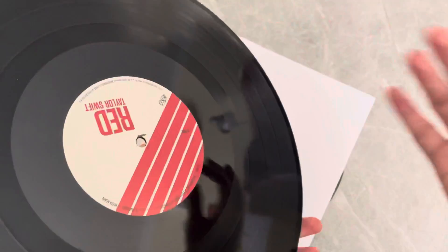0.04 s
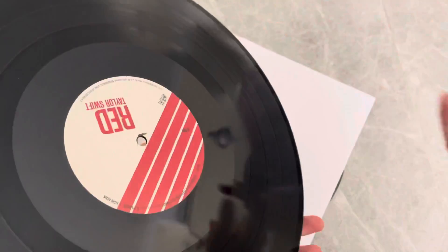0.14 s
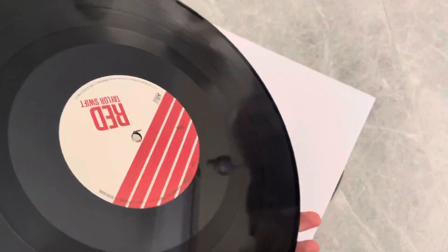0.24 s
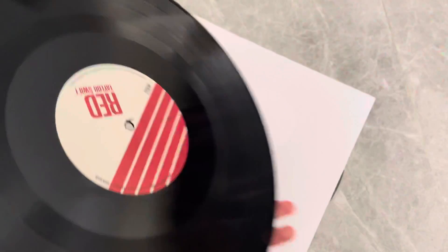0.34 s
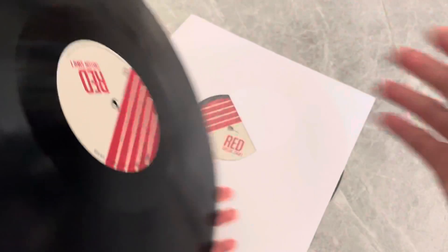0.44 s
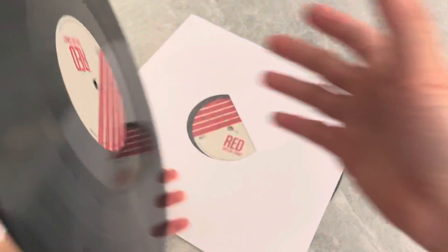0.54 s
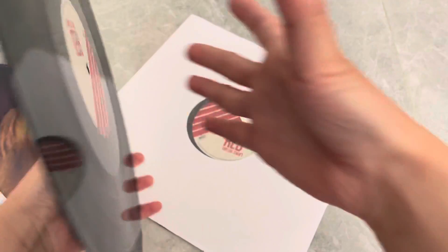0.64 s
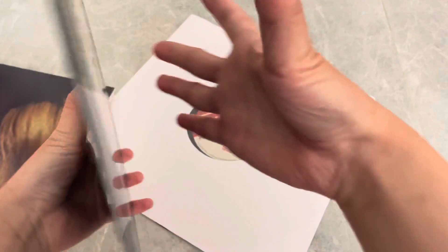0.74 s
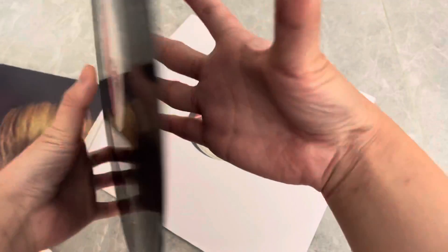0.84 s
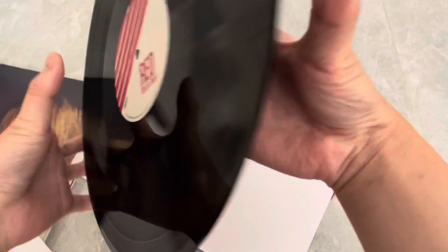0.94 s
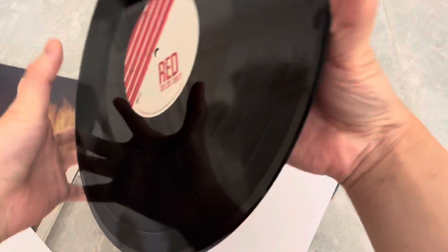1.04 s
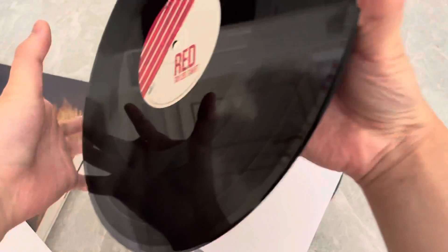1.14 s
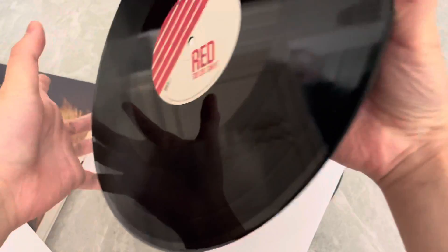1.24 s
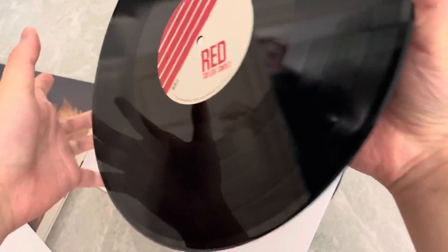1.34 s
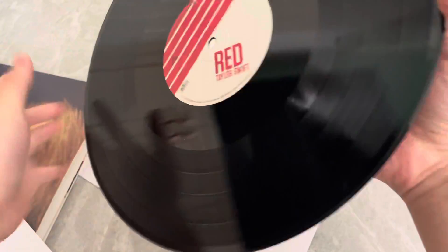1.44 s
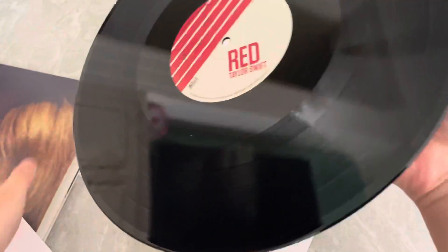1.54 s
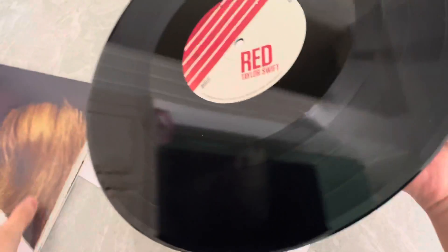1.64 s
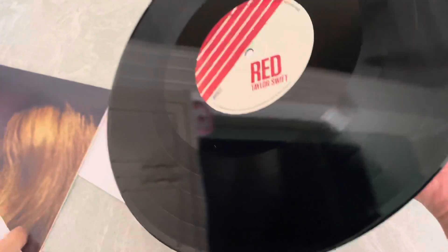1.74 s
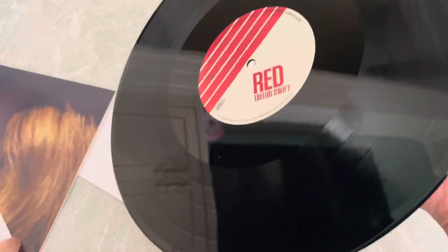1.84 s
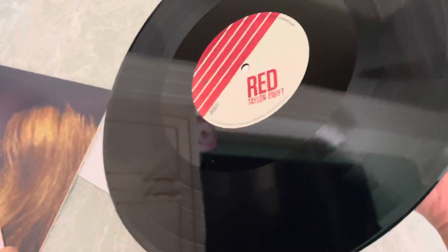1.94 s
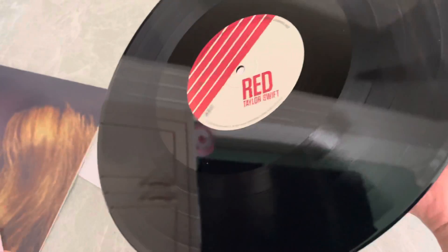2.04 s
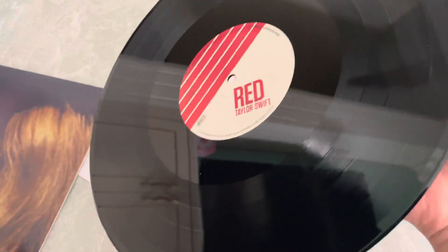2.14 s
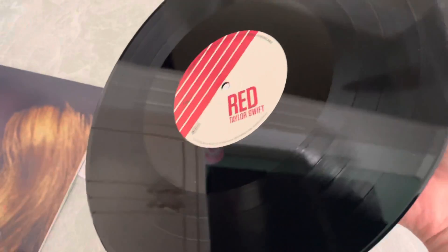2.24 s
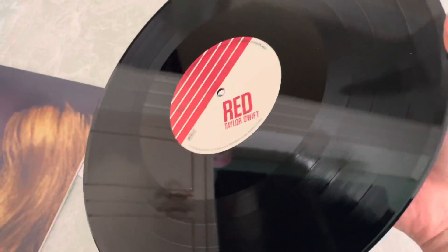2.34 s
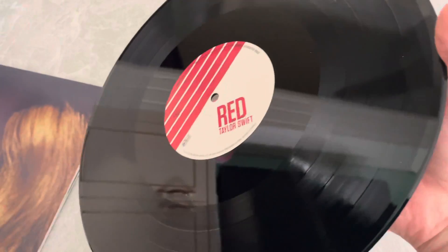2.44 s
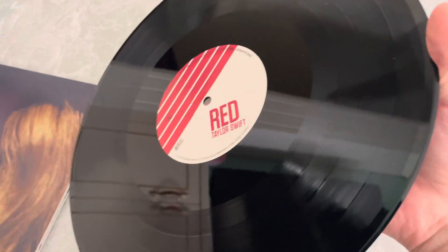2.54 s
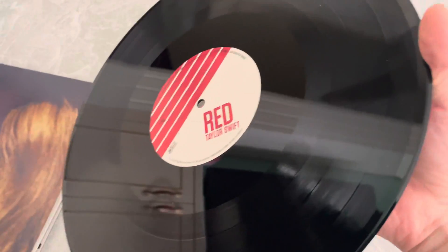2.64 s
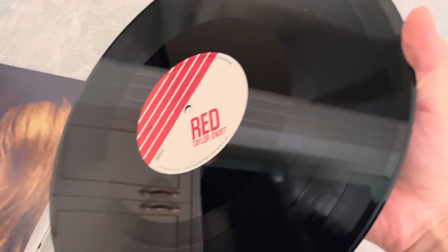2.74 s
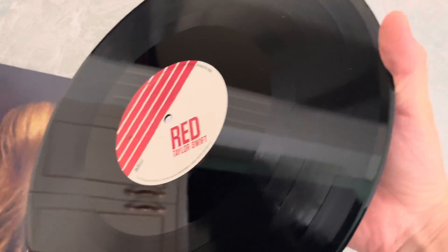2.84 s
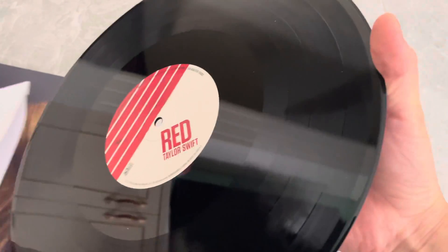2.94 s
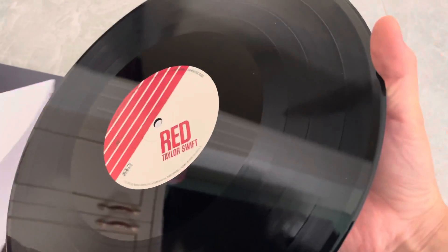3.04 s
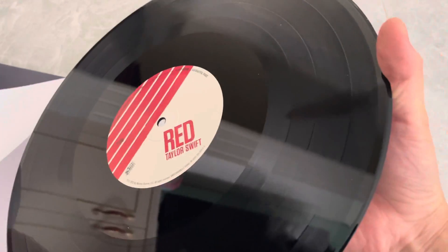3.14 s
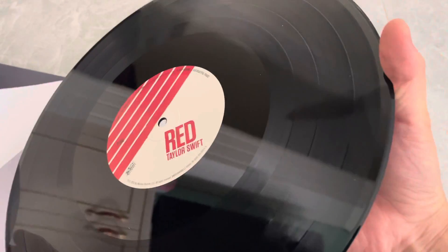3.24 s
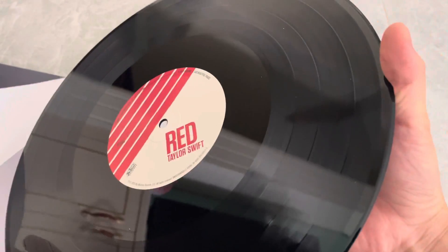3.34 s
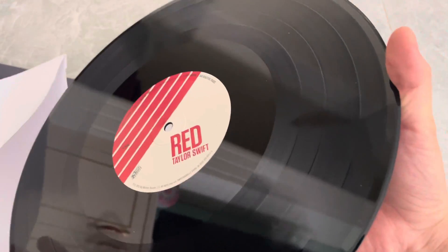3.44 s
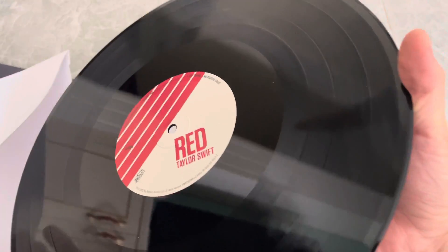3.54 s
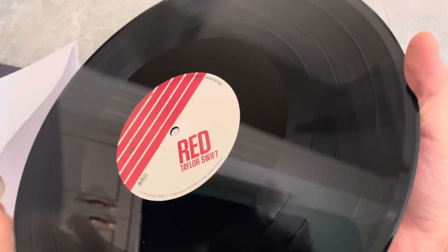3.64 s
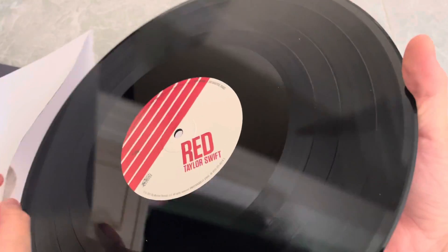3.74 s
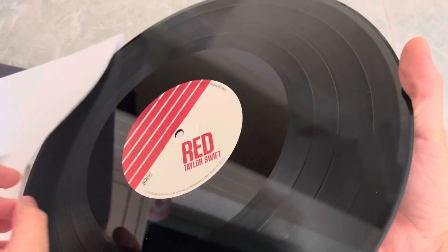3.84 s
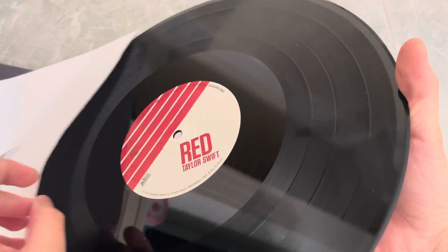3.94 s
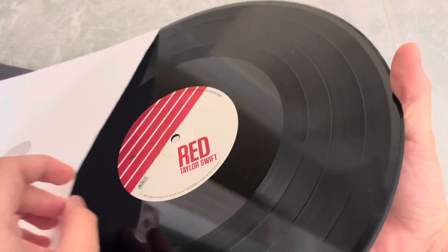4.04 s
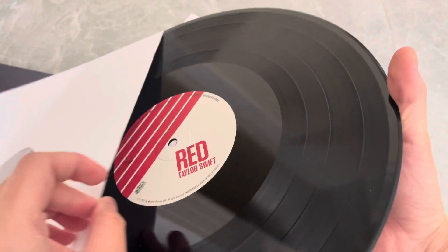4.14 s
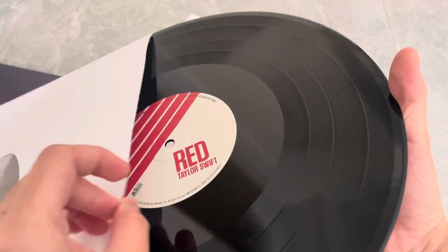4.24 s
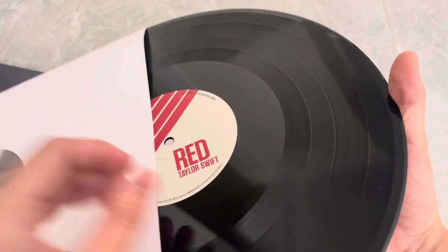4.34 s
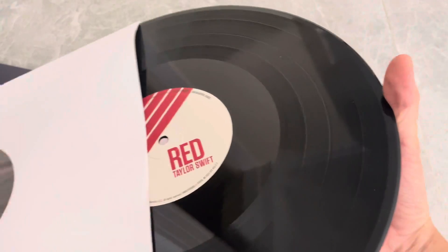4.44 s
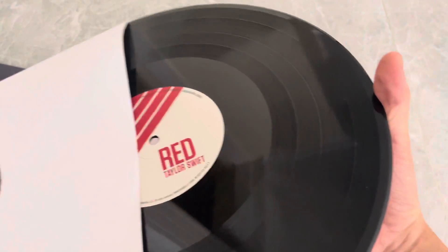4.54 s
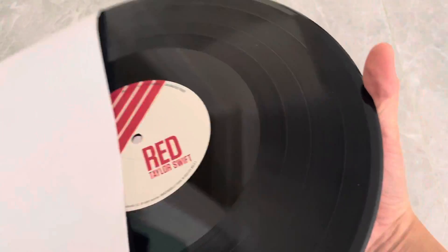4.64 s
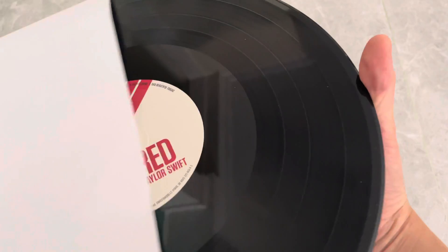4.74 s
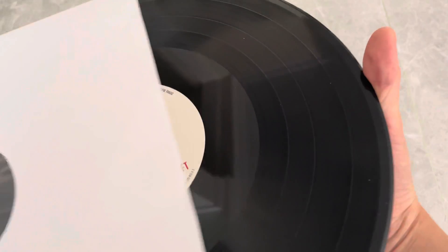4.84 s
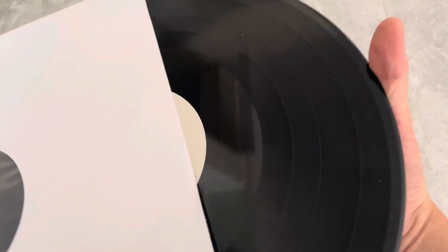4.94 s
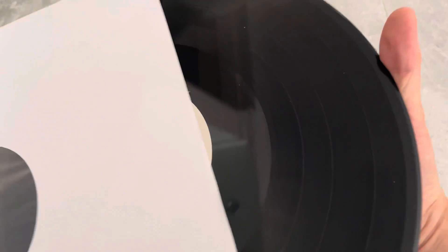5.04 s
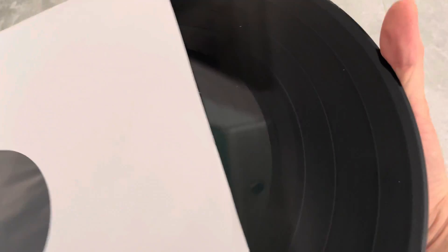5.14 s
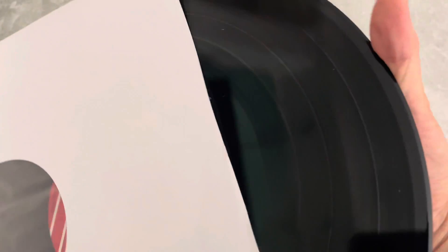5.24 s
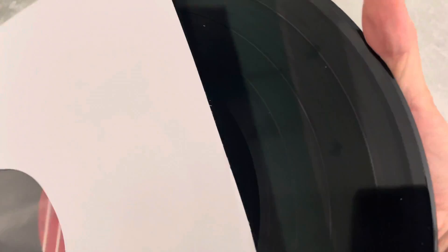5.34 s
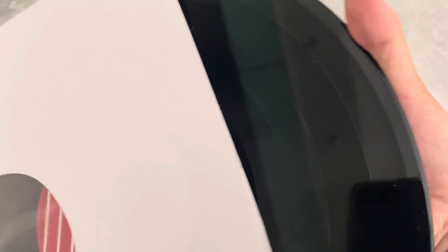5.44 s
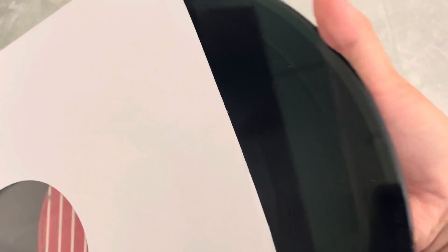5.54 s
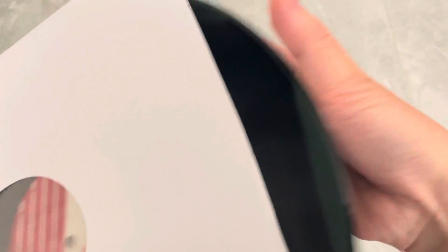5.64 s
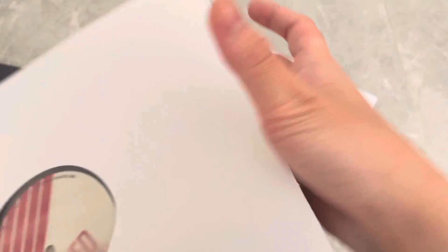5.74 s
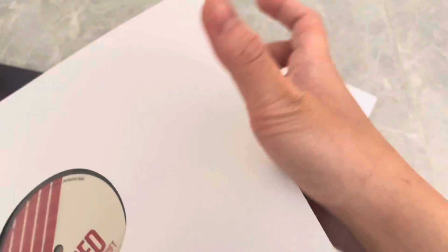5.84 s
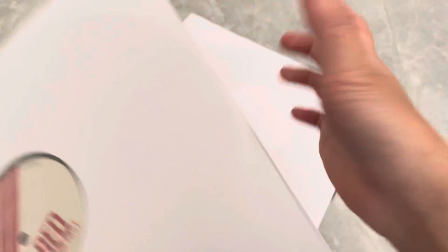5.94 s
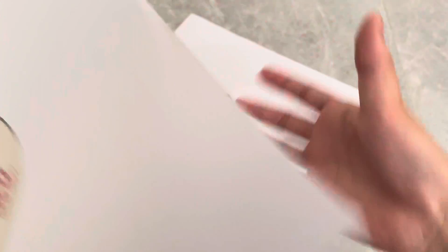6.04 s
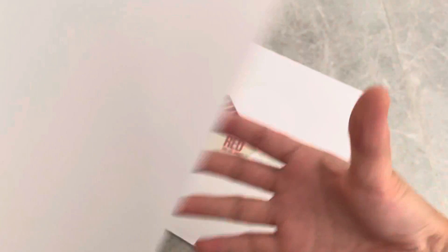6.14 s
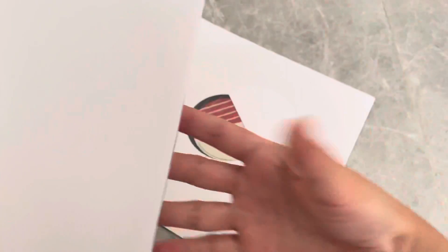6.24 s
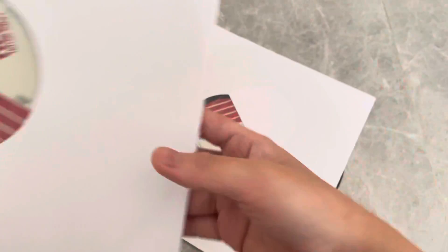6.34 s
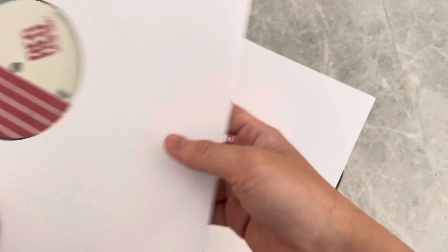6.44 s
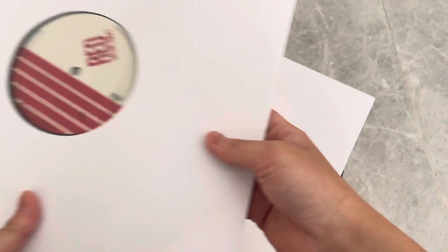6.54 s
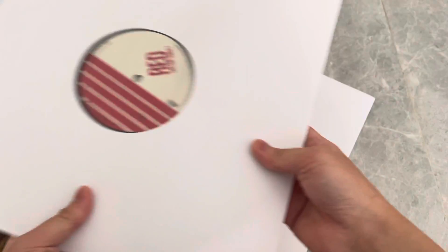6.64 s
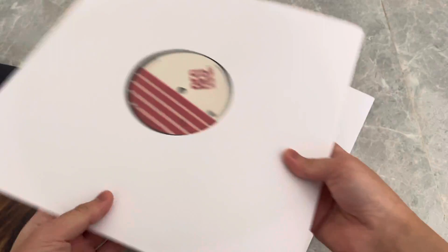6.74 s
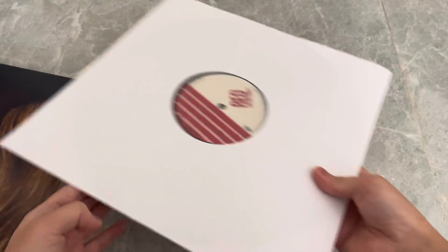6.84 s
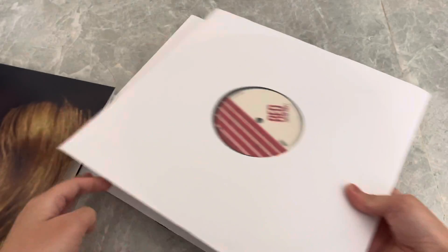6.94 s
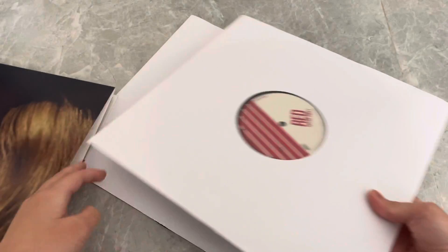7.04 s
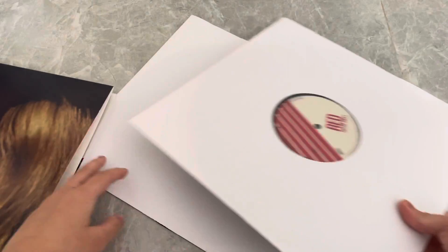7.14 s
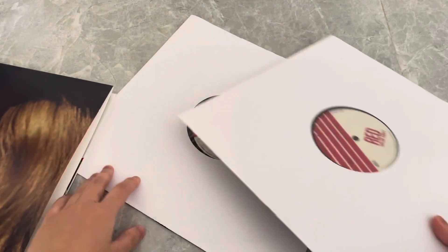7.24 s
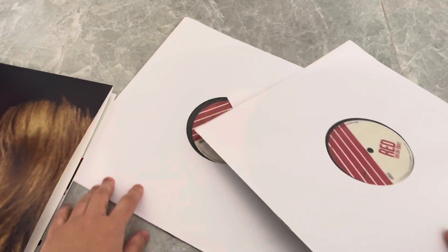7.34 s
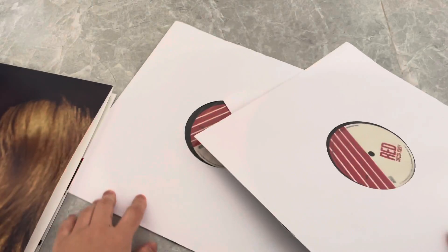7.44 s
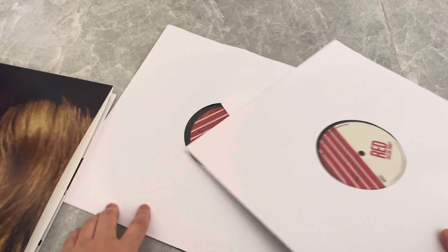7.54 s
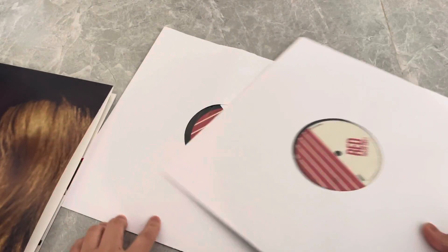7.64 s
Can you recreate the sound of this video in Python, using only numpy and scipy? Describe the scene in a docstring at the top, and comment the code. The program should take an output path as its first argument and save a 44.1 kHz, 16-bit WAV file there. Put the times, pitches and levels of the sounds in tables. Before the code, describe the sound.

A quiet room hums low throughout, and the handling is heard up close. From about 0.5 seconds come faint paper brushes and light taps as a vinyl record is turned, with a tiny thumb creak near 1.3 seconds. Around 2 seconds a paper sleeve slides with a thin hiss, joined by dry ticks and crinkles. From 3 seconds the paper rubs and buckles in uneven pushes, with soft low wobbles of the disc. The rustling grows after 4 seconds, and the sharpest snaps come at about 5 and 5.2 seconds. At 5.7 seconds the disc's edge slaps into the fold with a short scrape and a dull thump. Softer, airy paper brushing follows from 6 seconds. Light taps at about 7 and 7.3 seconds mark the sleeved record being laid down, ending with a brief slide.

```python
"""Vinyl disc into a paper sleeve.

A disc is turned in the hands, slid into its sleeve and laid on a stone floor; the quiet room hums.
Paper rubs on vinyl and skin: fibre clicks drive the sheet's modes, creases, rasp and hiss.
The sleeve buckles in snaps, ticks and pings. A thumb creaks on the rim; the disc wobbles and slaps
the fold. Two close microphone ports hear nearly the same sound, the treble turned in phase."""
import sys
import numpy as np
from scipy import signal
from scipy.fft import rfft, irfft, next_fast_len
from scipy.io import wavfile

SR = 44100
rng = np.random.default_rng(int(sys.argv[2]) if len(sys.argv) > 2 else 0)


def master_out(mix):
    """Clip the mix to full scale and print it as 16-bit PCM to the path in sys.argv[1]."""
    frames = np.transpose(np.atleast_2d(mix))
    ceiling = np.clip(frames, -1, 1)
    pcm = np.round(ceiling * 32767).astype(np.int16)
    wavfile.write(sys.argv[1], SR, pcm)


N = 339570

# room noise spectrum: freq_hz, gain_db
ROOM_SPECTRUM = [(15, -43.5), (25, -23), (53, -1), (86, -6.5), (118, -3), (149, -11), (203, -9.5),
                 (225, -13.5), (349, -22), (440, -19), (500, -22.5), (1170, -46), (12000, -56.5),
                 (15600, -89), (22000, -120)]
# wavering room tones: pitch_hz, width_hz, rms_db
HUM_TONES = [(119.9, 13, -70.5), (195.7, 3.2, -70.5), (442, 1.6, -77)]
# faint steady background noise: flex_db, crease_db, rasp_db, hiss_db
NOISE_FLOOR_DB = (-80, -91, -101, -103)
# left-right likeness: freq_hz, correlation
STEREO_LIKENESS = [(60, 0.94), (300, 0.86), (700, 0.41), (1500, 0.18), (3000, 0.36), (6000, 1), (12000, 1)]
# phase between ports: freq_hz, left_lead_rad
PORT_PHASE = [(0, 0), (690, .3), (1290, 0), (2840, .5), (4130, 0), (4910, .6), (6630, -.7), (7670, -3.0),
              (8870, -3.3), (9470, -4.1), (10400, -6.1), (12800, -6.5), (13900, -9.4), (16000, -9.4)]
# balance between ports: freq_hz, left_minus_right_db
PORT_BALANCE = [(60, 2.5), (110, 0), (200, 1.5), (380, 3.5), (700, 4.5), (1290, 2.5), (2380, 3.5),
                (4400, 4.5), (8120, 0), (15000, 0.5)]

# flexing modes of sleeve and disc: freq_hz, width_hz, gain_db
SHEET_MODES = [(75.5, 43, 4), (190, 155, 1.5), (325, 114, 4.5), (457.5, 73, 1.5), (544, 85, 0.5),
               (717, 360, -4), (908, 300, -25)]
# modes of the sleeve's fold: freq_hz, width_hz, gain_db
FOLD_MODES = [(315, 210, -2), (500, 280, -3), (1583, 320, -5.5), (2254, 150, -5), (2640, 390, -9),
              (3560, 340, -5), (4690, 1060, -17.5), (10700, 3300, -32.5)]
# rim modes under the thumb: freq_hz, width_hz, gain_db
RIM_MODES = [(610, 124, 47), (1990, 210, 37.5), (2930, 310, 26)]
# paper creasing: freq_hz, gain_db
CREASE_SPECTRUM = [(500, -26), (800, -9.5), (1050, -1), (1350, 3), (1600, 2), (1900, 3.5), (2400, 1),
                   (3200, -11.5), (5000, -59)]
# paper rasp: freq_hz, gain_db
RASP_SPECTRUM = [(1500, -45.5), (2300, -8), (2800, 2), (3600, 4), (4600, 1.5), (5500, -3.5), (7000, -12.5),
                 (9500, -18)]
# fine paper hiss: freq_hz, gain_db
HISS_SPECTRUM = [(3500, -36.5), (5500, -12), (7000, -3.5), (8200, -0.5), (10500, -7), (12500, -12),
                 (14000, -8.5), (15500, -25.5)]

# shoved disc swinging: start_s, level_db, pitch_hz, t60_s
WOBBLES = [(1.038, -48, 61, 0.17), (2.994, -42.5, 143, 0.1), (3.269, -52, 58.7, 0.16),
           (4.283, -35.5, 80.5, 0.25), (4.73, -65, 108, 0.25), (5.151, -32.5, 143, 0.048),
           (5.329, -38, 56.5, 0.19), (5.71, -30, 151, 0.12), (5.769, -35.5, 60.4, 0.23),
           (6.519, -44.5, 54, 0.2), (7.309, -53.5, 159, 0.19)]
# thumb slipping on the rim: time_s, slips_per_s, drive_db
THUMB_SLIPS = [(1.311, 160, -57), (1.334, 147, -57), (1.351, 200, -50), (1.369, 210, -50),
               (1.378, 140, -50)]
# steady slide of paper on vinyl and skin: time_s, rasp_db
SLIDE_LEVEL = [(1.57, -75), (1.63, -68), (1.86, -68), (2.1, -58), (2.215, -64), (2.29, -61.5), (2.355, -54),
               (2.45, -53), (2.56, -58), (2.6, -66.5), (2.685, -74.5), (2.74, -62), (3.05, -76.5),
               (3.15, -59.5), (3.24, -65.5), (3.65, -63), (3.8, -61), (3.87, -57.5), (4.24, -61),
               (4.42, -61), (4.535, -84), (4.64, -85), (4.86, -79), (5.02, -63), (5.35, -82), (5.47, -57.5),
               (5.56, -58), (5.64, -50.5), (5.69, -46.5), (5.76, -48), (5.81, -48), (5.88, -61),
               (6.046, -78), (6.28, -74.5), (6.39, -73), (6.51, -74.5), (6.56, -91.5), (6.88, -69),
               (6.92, -86), (6.99, -95), (7.24, -89), (7.49, -72), (7.578, -55.5), (7.7, -54)]
# slide colour, relative to rasp: time_s, flex_db, crease_db, hiss_db
SLIDE_COLOUR = [(1.6, -0.5, -1.5, 7), (2.1, -14.5, -10, -3.5), (2.5, -10.5, -6, 2.5),
                (2.65, -5.5, -3.5, -3), (3.1, -3.5, -8, -3.5), (3.898, -5.5, -3.5, 1),
                (4.4, 11.5, -1.5, -25), (4.9, -4, -7, 4), (5.3, 8, -9, -23), (5.56, -4.5, 1, -5),
                (5.8, 2.5, -1, -13), (6.2, 2, 6, -8), (6.34, -4.5, -25, -1.5), (6.75, -14, -23, 9),
                (6.9, -18, -11, 9), (6.97, 6, -4, 5), (7.1, 10.5, 3, 22), (7.4, -8, 9, 6.5),
                (7.6, -14, -11.5, 9)]
# shoves and brushes: peak_s, rise_s, fall_s, rasp_db; relative to rasp: flex_db, crease_db, hiss_db
STROKES = [(0.585, 0.03, 0.087, -79.5, -4, -30, 14.5), (0.65, 0.083, 0.034, -83, -11, -18, 14.5),
           (0.898, 0.034, 0.084, -86.5, 11, -7, 10), (1.02, 0.027, 0.12, -79.5, 18.5, 4, 2),
           (1.39, 0.14, 0.1, -74.5, 18, -1, -1), (2.785, 0.053, 0.24, -57, -1, 2.5, -7),
           (3.005, 0.032, 0.11, -60.5, 4.5, -2.5, 3), (3.261, 0.0067, 0.17, -58.5, 11.5, 5, -6),
           (3.395, 0.016, 0.18, -61.5, 1, 3.5, -4), (3.516, 0.031, 0.013, -47.5, -21, -12, -36),
           (3.69, 0.06, 0.082, -63.5, -2, 0, -7), (3.977, 0.024, 0.082, -48, 3, 5, -11),
           (4.124, 0.092, 0.12, -51.5, -2.5, 2.5, -13), (4.301, 0.06, 0.064, -50.5, 1.5, -4, -2.5),
           (4.605, 0.097, 0.059, -74.5, 8.5, 7, -38), (4.667, 0.02, 0.16, -44, 0, -9, -15),
           (4.758, 0.036, 0.2, -51.5, 3.5, 1.5, -4.5), (5.039, 0.021, 0.4, -53.5, 7.5, 3, -1.5),
           (5.164, 0.022, 0.12, -46, 2, 2.5, -4), (5.268, 0.088, 0.033, -51, -2.5, -1.5, -7),
           (5.437, 0.064, 0.45, -60, -4.5, -7, 2.5), (6.148, 0.077, 0.12, -67, 10.5, -3, 11.5),
           (6.435, 0.12, 0.097, -71, -19, -23, 5), (6.645, 0.059, 0.14, -68, -4, -28, 0),
           (6.83, 0.34, 0.12, -79.5, -28, -3, 13), (7.01, 0.0094, 0.26, -60.5, 2, 0, -11),
           (7.308, 0.043, 0.17, -60, 3, -10, 5.5)]
# narrow hiss in the slide: peak_s, rise_s, fall_s, level_db, pitch_hz, width_hz
SINGING_BANDS = [(0.6, 0.04, 0.12, -72, 4600, 1500), (2.08, 0.36, 0.2, -63.5, 4530, 690),
                 (2.36, 0.08, 0.2, -59, 4500, 600), (2.44, 0.2, 0.18, -53, 4500, 450),
                 (5.56, 0.1, 0.2, -57, 1510, 250), (5.66, 0.03, 0.03, -47, 1450, 200),
                 (5.81, 0.03, 0.03, -45, 1550, 250), (6.45, 0.05, 0.1, -66, 4900, 800),
                 (6.65, 0.08, 0.3, -64, 5250, 700), (6.82, 0.3, 0.2, -67.5, 4700, 607),
                 (7.01, 0.005, 0.1, -55.5, 950, 300), (7.14, 0.08, 0.04, -62, 1100, 250)]
# fibres or folds breaking: start_s, level_db
TICKS = [(2.2343, -32), (2.2385, -36), (2.2997, -28), (2.5092, -32), (2.9003, -44), (3.2924, -38),
         (3.3852, -38), (3.4047, -37), (3.4895, -36), (3.6775, -36), (4.4613, -41), (4.584, -42),
         (4.6084, -44), (4.994, -43), (5.3532, -42), (5.3654, -43), (5.4495, -24), (5.9858, -46),
         (7.1876, -45)]
# creases letting go: start_s, level_db, pitch_hz
PINGS = [(2.236, -39.5, 3250), (2.3, -43, 3500), (2.7599, -28, 3370), (2.7668, -36, 3230),
         (3.488, -36, 4870), (3.9825, -27, 3630), (4.2933, -19.5, 4550), (4.2935, -29, 6830),
         (4.7641, -46, 2210), (5.0365, -22, 2930), (5.157, -17.5, 2000), (5.4277, -31, 3000),
         (5.4505, -29, 3020)]
# disc edge hitting the fold: start_s, length_s, level_db
FOLD_SLAP = (5.7038, 0.0125, -18.5)
# sheet buckling or tapped, levels before trims: start_s, crack_db, thud_db, tick_db, patch_hz
SNAPS = [(1.0214, -50, -55.5, -67, 247), (1.261, -55, -53, -63, 250), (1.404, -52, -65, -59, 415),
         (1.4904, -46, -54, -59.5, 420), (1.497, -69, -44.5, -64, 333), (1.5732, -56, -45.5, -67, 378),
         (2.2352, -35, -93, -61, 452), (2.2984, -29, -100, -55, 436), (2.509, -57, -71, -39.5, 452),
         (2.53, -39, -53, -46, 590), (2.554, -32, -70, -44, 670), (2.758, -33, -47, -82, 474),
         (2.7644, -31, -49, -81, 765), (2.8579, -42, -45, -59, 253), (2.899, -29.5, -80, -51, 326),
         (2.992, -35.5, -69, -57, 352), (3.2589, -27.5, -26, -47, 287), (3.2934, -34, -48, -49.5, 440),
         (3.3218, -42.5, -61, -48.5, 659), (3.3862, -30, -40, -53, 395), (3.405, -36, -43, -44, 312),
         (3.4882, -47, -45, -68.5, 480), (3.6771, -35, -45.5, -44.5, 396), (3.967, -51, -50, -62, 297),
         (4.1193, -32, -42, -65, 334), (4.2938, -21, -47, -39.5, 303), (4.302, -31, -33.5, -63, 346),
         (4.317, -41, -41, -65, 248), (4.3707, -46, -42, -73, 625), (4.4598, -40, -79, -68, 432),
         (4.584, -47, -69, -64, 756), (4.6082, -40, -80, -55, 301), (4.661, -47, -37.5, -46, 420),
         (4.729, -37, -31.5, -72, 345), (4.737, -50, -38, -72, 350), (4.7642, -19, -30, -80, 350),
         (4.996, -41, -70, -75, 400), (5.0356, -7.5, -34.5, -24, 530), (5.043, -27, -29.5, -49.5, 330),
         (5.075, -27, -38.5, -54, 350), (5.135, -47.5, -43, -60.5, 460), (5.1547, -9.5, -32, -34, 430),
         (5.289, -45, -70, -43, 400), (5.354, -37, -64, -69, 400), (5.3657, -54, -51, -58, 227),
         (5.4275, -16, -41, -39.5, 1176), (5.449, -22, -86, -41, 436), (5.5074, -28, -49, -58, 440),
         (5.618, -47.5, -37.5, -62.5, 500), (5.635, -48, -39.5, -62, 510), (5.727, -14, -37, -34, 555),
         (5.7382, -17.5, -29.5, -39, 383), (5.7993, -37.5, -44, -46, 382), (5.985, -62, -73, -57, 436),
         (6.0353, -58.5, -46, -72.5, 287), (6.055, -72, -50, -78, 275), (6.282, -52, -63, -70, 400),
         (6.309, -63, -49.5, -78, 293), (6.3297, -42, -49.5, -81, 540), (6.428, -78, -52, -67, 254),
         (6.635, -57, -53.5, -77, 296), (7.0058, -41, -44.5, -76, 776), (7.026, -60, -68, -74, 900),
         (7.068, -43, -54.5, -70, 950), (7.1875, -64, -78, -56, 307), (7.261, -67, -51, -70, 680),
         (7.297, -57, -53, -65, 806), (7.3073, -48, -43, -63, 278)]

SNAP_T60_S = (0.073, 0.03, 0.017, 0.022)   # thud, knock, crack, tick
SNAP_RISE_S = (0.00019, 0.0013, 0.0017, 0.00024)
HIT_UNSHARED = 0.3   # hits come from one spot: share of left-right unlikeness kept


def from_db(db):
    """Decibels to gain."""
    return 10 ** (np.asarray(db) / 20)


def rms_one(x):
    """Scale to rms 1."""
    return x / np.sqrt(np.mean(x ** 2) + 1e-20)


def at_hz(points, hz):
    """Table lookup on a log-frequency axis."""
    table = np.array(points, float)
    return np.interp(np.log(hz + 1), np.log(table[:, 0] + 1), table[:, 1])


def shaped(x, response):
    """Filter by a response given as a function of Hz."""
    size = next_fast_len(N + 4096)
    hz = np.arange(size // 2 + 1) * SR / size
    return irfft(rfft(x, size) * response(hz), size)[..., :N]


def coloured(x, spectrum):
    """Filter by a spectrum table."""
    return shaped(x, lambda hz: from_db(at_hz(spectrum, hz)))


def butter(x, order, cutoff_hz, kind="low"):
    """Butterworth filter."""
    return signal.sosfilt(signal.butter(order, cutoff_hz, kind, fs=SR, output="sos"), x)


def drift(rate_hz):
    """Smooth random wander, rms 1."""
    pole = np.exp(-2 * np.pi * rate_hz / SR)
    return rms_one(signal.lfilter([1], [1, -2 * pole, pole * pole], rng.standard_normal(N + SR))[SR:])


def resonance(x, hz, width_hz):
    """Two-pole band-pass, peak gain 1."""
    r = np.exp(-np.pi * width_hz / SR)
    gain = (1 - r * r) / 2
    trickle = 1e-15 * (np.arange(x.shape[-1]) % 7)   # avoids denormals
    return signal.lfilter([gain, 0, -gain], [1, -2 * r * np.cos(2 * np.pi * hz / SR), r * r], x + trickle)


def ring(x, modes):
    """Parallel modes of alternating sign."""
    return sum((-1) ** k * from_db(db) * resonance(x, hz, width_hz)
               for k, (hz, width_hz, db) in enumerate(modes))


def spread(pair, unshared=1):
    """Two independent signals to stereo with frequency-dependent likeness."""
    def alike(hz):
        return 1 - unshared * (1 - at_hz(STEREO_LIKENESS, hz))
    mid = shaped(pair[0], lambda hz: np.sqrt((1 + alike(hz)) / 2))
    side = shaped(pair[1], lambda hz: np.sqrt((1 - alike(hz)) / 2))
    return np.array([mid + side, mid - side])


def add_at(track, start_s, event):
    """Mix an event into a mono track."""
    i = round(start_s * SR)
    track[i:i + len(event)] += event[:N - i]


def burst(t, level_db, t60_s, rise_s):
    """Envelope: quick rise, exponential decay."""
    return from_db(level_db - 60 * t / t60_s) * (1 - np.exp(-t / rise_s))


def stroke(peak_s, rise_s, fall_s):
    """Span and envelope of one movement: up 20 dB per rise_s, down 20 dB per fall_s."""
    span = slice(max(round((peak_s - 3 * rise_s) * SR), 0), min(round((peak_s + 3 * fall_s) * SR), N))
    t = np.arange(span.start, span.stop) / SR - peak_s
    return span, from_db(20 * np.minimum(t / rise_s, -t / fall_s))


def room_tone(noise_db=-62.5):
    """Dull steady noise and wavering tones."""
    noise = coloured(rng.standard_normal((2, N)), ROOM_SPECTRUM)
    hum = sum(from_db(db) * rms_one(resonance(rng.standard_normal(N), hz, width_hz))
              for hz, width_hz, db in HUM_TONES)
    return spread(from_db(noise_db + drift(2.3)) * rms_one(noise)) + hum


def room_reverb(x, t60_s=0.08, gain_db=-15, wall_cutoff_hz=4500):
    """Diffuse tail: decaying noise, independent per channel."""
    t = np.arange(int(.6 * SR)) / SR
    tail = rng.standard_normal((2, len(t))) * from_db(-60 * t / t60_s) * (t > .006)
    tail = butter(tail, 1, wall_cutoff_hz)
    tail /= np.sqrt(np.sum(tail ** 2, axis=1, keepdims=True))
    return from_db(gain_db) * signal.fftconvolve(x.mean(0)[None], tail, axes=1)[:, :N]


def disc_wobbles():
    """Low damped swings of the whole disc."""
    out, t = np.zeros(N), np.arange(SR // 2) / SR
    for start_s, db, hz, t60_s in WOBBLES:
        add_at(out, start_s, burst(t, db, t60_s, rise_s=0.00065) * np.sin(2 * np.pi * hz * t))
    return out


def sheet_flex(x, top_hz=1130):
    """Low modes of sleeve and disc."""
    return butter(ring(x, SHEET_MODES), 4, top_hz)


def thumb_creak():
    """Skin sticks and slips on vinyl: uneven clicks into the disc, each trailing a dull scrape."""
    time_s, slips_per_s, drive_db = np.transpose(THUMB_SLIPS)
    t = np.arange(N) / SR
    rate_hz = np.interp(t, time_s, slips_per_s) * (1 + 0.03 * drift(67)) * (t > time_s[0])
    cycles = np.cumsum(rate_hz) / SR + .8   # early first slip
    drive = from_db(np.interp(t, time_s, drive_db)) * (t < time_s[-1])
    slips = np.diff(np.floor(cycles), prepend=0) * drive
    scrape = signal.lfilter([1], [1, -.988], slips) * rng.standard_normal(N)
    dull_scrape = signal.lfilter([.45], [1, -.55], scrape)
    soft_slips = signal.lfilter([.12], [1, -.88], slips)   # skin is a soft contact
    rim = sum(from_db(db) * resonance(soft_slips, hz, width_hz) for hz, width_hz, db in RIM_MODES)
    return from_db(39) * sheet_flex(soft_slips) + rim + from_db(6.5) * dull_scrape


def fibre_clicks(per_s, uneven_db):
    """Fibres catch and let go: two random click trains, rms 1."""
    sizes = from_db(uneven_db * np.minimum(rng.exponential(1, (2, N)), 4))
    signs = rng.choice([-1, 1], (2, N))
    return rms_one(sizes * signs * (rng.random((2, N)) < per_s / SR))


def paper(envelopes, per_s, uneven_db):
    """Fibre clicks excite flex, crease, rasp and hiss, one envelope each."""
    clicks = fibre_clicks(per_s, uneven_db)
    out = sheet_flex(clicks * envelopes[0]) / np.std(sheet_flex(clicks[0]))
    for spectrum, envelope in zip([CREASE_SPECTRUM, RASP_SPECTRUM, HISS_SPECTRUM], envelopes[1:]):
        out += coloured(clicks * envelope, spectrum) / np.std(coloured(clicks[0], spectrum))
    return out


def contact_envelopes():
    """Flex, crease, rasp and hiss envelopes: slide and strokes over faint steady background noise."""
    t = np.arange(N) / SR
    time_s, flex_db, crease_db, hiss_db = np.transpose(SLIDE_COLOUR)
    colours_db = [flex_db, crease_db, np.zeros_like(time_s), hiss_db]
    slide_db = np.interp(t, *np.transpose(SLIDE_LEVEL), left=-120)
    envelopes = np.array([from_db(slide_db + np.interp(t, time_s, colour_db)) + from_db(floor_db)
                          for colour_db, floor_db in zip(colours_db, NOISE_FLOOR_DB)])
    for peak_s, rise_s, fall_s, rasp_db, flex_db, crease_db, hiss_db in STROKES:
        span, shape = stroke(peak_s, rise_s, fall_s)
        envelopes[:, span] += shape * from_db(rasp_db + np.array([[flex_db], [crease_db], [0], [hiss_db]]))
    return envelopes


def wandering_contact(x, depth_db=1.8, rate_hz=6):
    """Contact wanders over the sheet: half-octave bands swell and sink independently."""
    def band(centre_hz):
        return shaped(x, lambda hz: np.cos(np.pi * np.clip(np.log2((hz + 1) / centre_hz), -.5, .5)) ** 2)
    return sum(band(hz) * from_db(depth_db * drift(rate_hz)) for hz in 125 * 2 ** np.arange(0, 7.6, .5))


def paper_rubbing():
    """Dense fibre clicks under wavering pressure, plus sparse crackle of the bending sheet."""
    pressure_db = drift(13)
    envelopes = [envelope * from_db(pressure_db + drift(23)) for envelope in contact_envelopes()]
    crackle = from_db(-14) * paper(envelopes, per_s=300, uneven_db=3)
    friction = paper(envelopes, per_s=9000, uneven_db=2)
    return spread(wandering_contact(friction + crackle))


def paper_singing():
    """Friction noise picked out by one resonance between the sheets."""
    clicks, out = fibre_clicks(per_s=19000, uneven_db=11), np.zeros((2, N))
    for peak_s, rise_s, fall_s, db, hz, width_hz in SINGING_BANDS:
        span, shape = stroke(peak_s, rise_s, fall_s)
        band = resonance(resonance(clicks[:, span], hz, width_hz), hz, width_hz)
        out[:, span] += from_db(db) * shape * rms_one(band)
    return spread(out)


def fibre_ticks(t60_s=0.01, band_hz=(2400, 14000)):
    """Single fibres or folds break: dry, bright spits of noise."""
    out = 1e-15 * rng.standard_normal(N)   # avoids denormals
    t = np.arange(SR // 50) / SR
    for start_s, db in TICKS:
        add_at(out, start_s, from_db(db - 60 * t / t60_s) * rng.uniform(-0.64, 1, len(t)))
    return butter(out, 2, band_hz, "band")


def crease_pings(t60_s=0.012, roughness=0.4):
    """A crease lets go and its taut edge rings, high and rough."""
    out, t = np.zeros(N), np.arange(SR // 10) / SR
    for start_s, db, hz in PINGS:
        add_at(out, start_s, from_db(db - 60 * t / t60_s) * np.sin(2 * np.pi * hz * t))
    return out * (1 + roughness * drift(1150))


def fold_slap(rise_s=0.0006, release_db_per_s=3000):
    """The disc's edge hits the fold: a short run of hard contacts into its modes."""
    start_s, length_s, level_db = FOLD_SLAP
    t = np.arange(N) / SR - start_s
    gate = np.clip(t / rise_s, 0, 1) * from_db(-release_db_per_s * np.maximum(t - length_s, 0))
    clicks = fibre_clicks(per_s=9000, uneven_db=2)
    fold = ring(clicks * gate, FOLD_MODES) / np.std(ring(clicks[0], FOLD_MODES))
    return spread(from_db(level_db) * fold, HIT_UNSHARED)


def sleeve_snaps(pitch_excess=1.5, sag_s=0.0025, crack_share=0.73):
    """A patch buckles: a burst of fibre clicks and a pop whose pitch sags as the patch slackens."""
    envelopes, pops, t = np.zeros((4, N)), np.zeros(N), np.arange(SR // 3) / SR
    sagging_t = t + pitch_excess * sag_s * (1 - np.exp(-t / sag_s))
    for start_s, crack_db, thud_db, tick_db, patch_hz in SNAPS:
        knock_db = crack_share * crack_db + (1 - crack_share) * thud_db
        trimmed_db = [thud_db - 7.5, knock_db - 7, crack_db - 8, tick_db + 4]
        for envelope, db, t60_s, rise_s in zip(envelopes, trimmed_db, SNAP_T60_S, SNAP_RISE_S):
            add_at(envelope, start_s, burst(t, db, t60_s, rise_s))
        patch_tone = np.sin(2 * np.pi * patch_hz * sagging_t)
        add_at(pops, start_s, burst(t, thud_db + 7, t60_s=0.023, rise_s=0.0013) * patch_tone)
    return spread(paper(envelopes, per_s=9000, uneven_db=3.5), HIT_UNSHARED) + pops


def scene():
    """Hands, paper and disc up close, the room behind."""
    hits = sleeve_snaps() + fibre_ticks() + crease_pings() + fold_slap() + thumb_creak()
    return hits + room_reverb(hits) + disc_wobbles() + paper_rubbing() + paper_singing() + room_tone()


def record(dry):
    """Two ports, each with its own level and phase by frequency; deep bass and top cut."""
    low_cut_hz, high_cut_hz = 36, 16300
    half = np.array([[.5], [-.5]])

    def port_response(hz):
        return from_db(half * at_hz(PORT_BALANCE, hz)) * np.exp(1j * half * at_hz(PORT_PHASE, hz))
    ports = butter(shaped(dry, port_response), 2, low_cut_hz, "high")
    return signal.sosfilt(signal.cheby2(20, 60, high_cut_hz, fs=SR, output="sos"), ports)


dry = scene()
out = record(dry)
master_out(out)
```